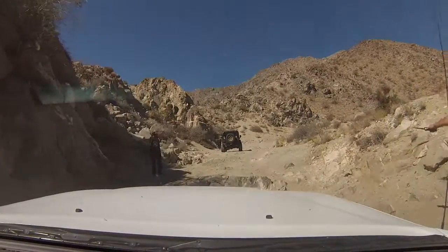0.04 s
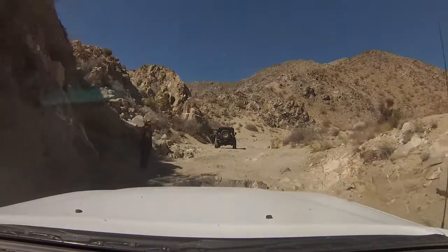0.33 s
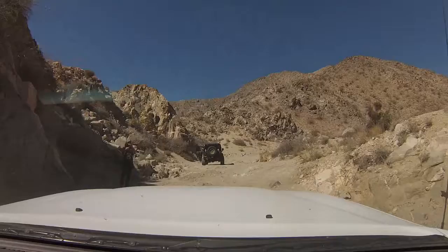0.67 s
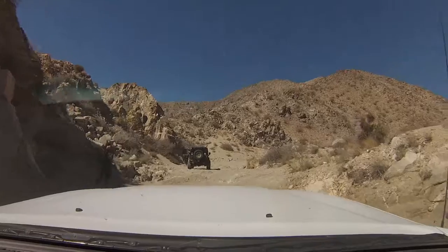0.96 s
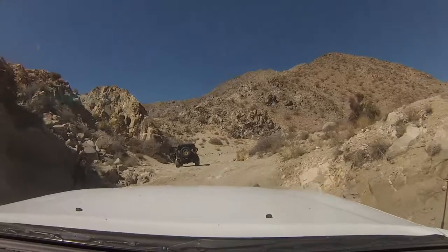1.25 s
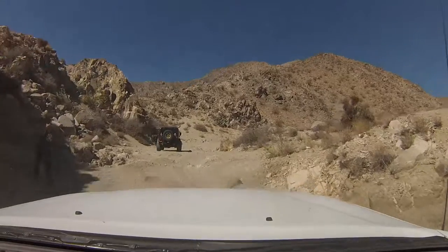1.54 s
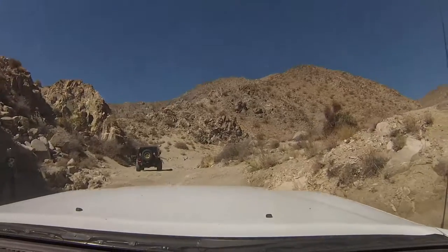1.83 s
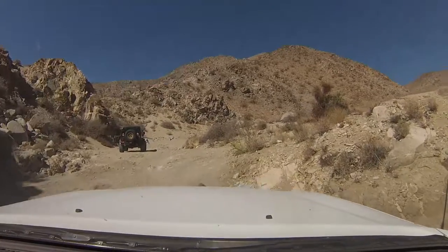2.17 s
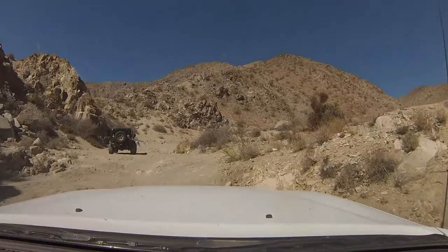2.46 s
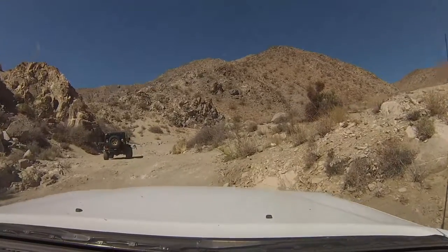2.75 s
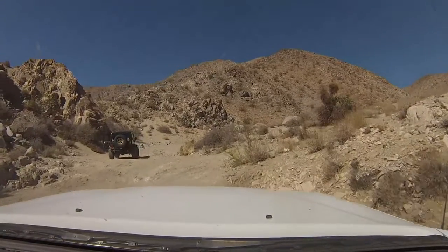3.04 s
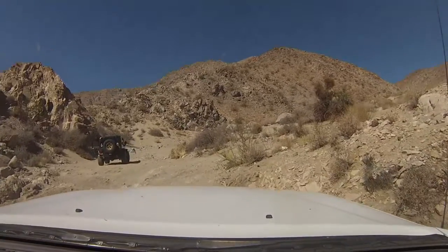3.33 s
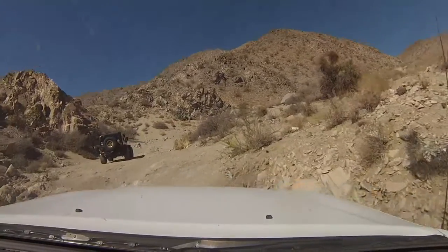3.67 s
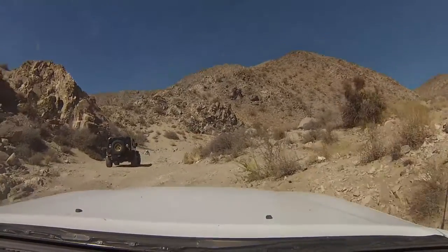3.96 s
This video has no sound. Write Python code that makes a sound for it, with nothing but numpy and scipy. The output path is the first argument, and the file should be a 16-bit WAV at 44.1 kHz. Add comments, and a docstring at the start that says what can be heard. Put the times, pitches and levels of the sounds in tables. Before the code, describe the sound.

A deep, throbbing rumble fills an off-road vehicle's cabin as it creeps over a stony trail, swelling near 0.7, 1.7 and 3.7 seconds. A hard fitting close by knocks sharply at about 0.4, 0.7, 1.6 and 1.9 seconds, each a crack with a short ring. Stones thud through the chassis, heaviest around 3.5 seconds. Trim rattles and squeaks faintly on the bumps, over quiet, muffled tyre grit.

```python
"""A deep cabin boom and chassis rumble inside an off-road vehicle creeping along a sandy, stony trail.
The cabin air throbs at one low pitch. As the body rocks, a hard fitting close by knocks sharply
four times, each a crack and a short ring. Stones thud through the chassis and tyres grind over grit.
A loose panel taps; trim rattles, scrapes and squeaks on the bumps, over a faint hiss."""
import sys
import numpy as np
from scipy.fft import rfft, irfft, next_fast_len
from scipy.io import wavfile
from scipy.ndimage import map_coordinates

SR = 44100
rng = np.random.default_rng(int(sys.argv[2]) if len(sys.argv) > 2 else 0)


def file_out(sig):
    """Save sig as 16-bit WAV at sys.argv[1]."""
    # one column per channel
    cols = np.atleast_2d(sig).T
    # limit, then scale
    lim = np.clip(cols, -1, 1)
    pcm = np.round(lim * 32767).astype(np.int16)
    wavfile.write(sys.argv[1], SR, pcm)


N = 176400
T = np.arange(N) / SR

# cabin boom: time_s, level_db
BOOM_LEVEL = [(0.0, -26.5), (0.14, -33.5), (0.4, -26), (0.5, -31), (0.57, -31), (0.64, -18.5),
              (0.73, -20.5), (0.83, -26), (0.96, -43), (1.0, -33.5), (1.18, -38.5), (1.43, -26),
              (1.6, -27.5), (1.66, -20), (2.04, -29), (2.26, -42), (2.6, -35), (2.72, -42.5), (2.78, -33.5),
              (2.91, -36.5), (2.96, -31.5), (3.03, -35.5), (3.12, -43), (3.25, -25), (3.36, -38.5),
              (3.41, -27), (3.48, -38.5), (3.52, -28), (3.64, -34.5), (3.7, -22), (3.83, -49),
              (3.91, -28.5), (4.0, -33)]
# boom fundamental: time_s, pitch_hz
BOOM_PITCH = [(0.0, 27.75), (0.17, 30.42), (0.8, 30.15), (0.89, 31.83), (2.16, 31.74), (2.4, 28.67),
              (3.16, 30.36), (3.65, 28.29), (3.75, 24.62)]
# boom overtones: harmonic, gain_db
BOOM_OVERTONES = [(2, -30), (3, -38)]

# knocks of the fitting: start_s, level_db, crack_db, rebound_db, tail_db, tail_top_mode_db
KNOCKS = [(0.4389, -16, 2, -12, 2, -13), (0.722, -14.5, -8, -12, -6.5, 4), (1.607, -13.5, 0, -14, 0, 0),
          (1.852, -13.5, -1, -11.5, -1, 3.5)]
# modes of the fitting: freq_hz, gain_db, t60_s
FITTING_MODES = [(290, -24, .022), (540, -13, .03), (820, -31, .02), (1390, -7.5, .012), (1510, -10.5, .02),
                 (2180, 2, .0175), (2620, -24, .012), (3200, -15, .012), (4060, -22, .028),
                 (4500, -24, .02), (5400, -23, .009), (7300, -20, .009)]
# metal bracket ringing on: freq_hz, gain_db, t60_s
BRACKET_MODES = [(2435, -34, .14), (3984, -51.5, 0.27), (4610, -57.5, .3)]
# contact crack: freq_hz, gain_db
CRACK_SPECTRUM = [(300, -23.5), (1500, -17.5), (3300, -1), (5000, 1.5), (7500, -3.5), (8700, -20.5),
                  (10200, -9), (13000, -23), (16000, -31)]
# panel behind the fitting: freq_hz, gain_db
THUMP_SPECTRUM = [(70, -18), (130, -2.5), (195, -3), (300, -14), (550, -22.5), (900, -32), (1500, -31),
                  (2400, -27), (3500, -42), (8000, -85)]

# suspension thuds: time_s, level_db
THUD_LEVEL = [(0.04, -41.5), (0.33, -51), (0.55, -39.5), (0.73, -35), (0.86, -40), (1.04, -49),
              (1.32, -40.5), (1.56, -51.5), (1.65, -38), (2.1, -44.5), (2.55, -52), (2.72, -49.5),
              (2.89, -40.5), (3.03, -43.5), (3.12, -56), (3.2, -48), (3.38, -50.5), (3.47, -36.5),
              (3.51, -27), (3.55, -41), (3.7, -45), (3.76, -44.5), (3.86, -44.5), (3.97, -39)]
# suspension thuds: freq_hz, gain_db
THUD_SPECTRUM = [(8, -22), (20, -7), (32, 1), (48, 7.5), (64, 2.5), (82, -8), (130, -31), (250, -84),
                 (600, -120)]
# roar of the drive: time_s, level_db
ROAR_LEVEL = [(0.0, -52), (0.17, -56.5), (0.53, -52), (0.8, -49.5), (0.93, -54), (1.02, -55.5),
              (1.38, -54.5), (1.53, -55.5), (1.65, -54), (1.76, -47.5), (1.85, -50), (1.99, -53.5),
              (2.22, -57.5), (2.54, -57), (2.7, -56.5), (2.9, -55.5), (3.06, -54.5), (3.13, -60.5),
              (3.23, -52.5), (3.32, -57), (3.38, -52.5), (3.53, -51), (3.62, -53.5), (3.72, -49),
              (3.82, -56.5), (4.0, -53)]
# roar of the drive: freq_hz, gain_db
ROAR_SPECTRUM = [(50, -24), (88, 2), (105, 1), (135, -4), (195, -1.5), (250, -11.5), (320, -18), (420, -23),
                 (560, -25), (850, -34), (1500, -74.5), (4000, -120)]
# wheels meeting stones: start_s, level_db, body_pitch_hz
BUMPS = [(0.222, -36.5, 110), (0.317, -42, 110), (0.45, -38.5, 140), (0.611, -35, 190.5),
         (0.651, -31, 103.2), (1.246, -44, 160), (1.661, -40.5, 185.8), (1.832, -40.5, 238),
         (2.015, -48.5, 218), (2.144, -44.5, 215.4), (2.33, -47, 200), (2.435, -42, 96),
         (2.745, -44, 133.5), (2.836, -39, 116), (2.965, -47, 130), (3.405, -43.5, 195.5),
         (3.496, -36.5, 207), (3.689, -40, 186.3)]
# body shudder on a stone: freq_hz, gain_db
SHUDDER_SPECTRUM = [(50, -12.5), (105, 2), (150, -2.5), (200, -6), (300, -20), (560, -28), (1000, -57.5),
                    (2500, -120)]

# loose panel taps: start_s, level_db, body_db, bounce_db
TAPS = [(0.6145, -51.5, 2.5, -16), (0.6331, -50.5, 3.5, -14), (0.973, -52, -10, -9.5),
        (2.0703, -57.5, -14.5, -6), (2.392, -59, -8, 2), (3.2428, -55.5, -4.5, -6), (3.6611, -47.5, 1, -14)]
# panel ring: freq_hz, gain_db, t60_s
PANEL_MODES = [(1300, -6.5, .04), (1480, -6, 0.032), (2100, -5.5, 0.052), (2480, -9.5, 0.054)]
# hollow panel body: freq_hz, gain_db, t60_s
PANEL_BODY_MODES = [(304, -1.5, 0.035), (528, -0.5, 0.071), (840, -7.5, 0.031)]
# shaken trim: start_s, level_db, t60_s
RATTLES = [(0.637, -54.5, 0.11), (0.884, -59.5, 0.077), (1.656, -49.5, 0.16), (1.696, -56, 0.13),
           (1.776, -60, .1), (1.815, -58, .1), (2.33, -63.5, 0.15), (2.408, -64, 0.1), (3.46, -56, 0.2),
           (3.495, -61.5, 0.28), (3.72, -57.5, 0.2)]
# trim and panel contacts: freq_hz, gain_db
TRIM_SPECTRUM = [(200, 0), (560, 6.5), (900, -5.5), (1480, 7.5), (1900, -5.5), (2350, 5.5), (2800, -11.5),
                 (3400, -8), (4800, -19.5), (6200, -22), (8000, -31.5), (16000, -53.5)]

# tyres on grit: time_s, level_db
GRIT_LEVEL = [(0.0, -75), (0.3, -76.5), (0.59, -69), (0.77, -68.5), (1.37, -78), (1.55, -77), (1.65, -68.5),
              (1.77, -67.5), (1.94, -70), (2.04, -76.5), (2.6, -79), (2.83, -77), (3.4, -74), (3.55, -71),
              (3.72, -68.5), (3.84, -74.5)]
# tyres on grit: freq_hz, gain_db
GRIT_SPECTRUM = [(300, -12.5), (600, -8.5), (950, -5), (1200, -2), (1480, 4), (1900, -6.5), (2350, 0.5),
                 (2750, -15.5), (3400, -12.5), (4500, -28), (6200, -23), (9000, -39.5), (16000, -68)]
# crushed gravel patches: start_s, length_s, level_db
CRUNCHES = [(0.15, 0.054, -71), (1.06, 0.065, -74), (1.135, 0.086, -69), (1.22, 0.08, -69.5),
            (2.65, 0.17, -75), (2.9, .13, -72), (3.3, 0.069, -67.5), (3.71, .04, -61), (3.94, 0.067, -71)]
# crushed gravel: freq_hz, gain_db
CRUNCH_SPECTRUM = [(500, -16.5), (1000, -10), (1250, 0.5), (1520, 3.5), (1900, -9), (2350, -6.5),
                   (2800, -19), (4500, -28.5), (9000, -46)]

# sliding trim: start_s, length_s, level_db
SCRAPES = [(0.335, .07, -75), (0.62, 0.11, -74.5), (1.645, 0.18, -71.5), (2.315, .055, -77),
           (3.23, .04, -78), (3.62, 0.095, -79)]
# sliding trim: freq_hz, gain_db
SCRAPE_SPECTRUM = [(2000, -22.5), (3200, 6), (4500, -3), (6200, 3), (7200, -7.5), (8600, -7), (11500, -13),
                   (15000, -27)]
# rubbing trim: start_s, length_s, pitch_hz, level_db, scratch_0_to_1
SQUEAKS = [(0.454, 0.0066, 6200, -63, 0.9), (0.646, 0.034, 6100, -74.5, 0.6), (1.04, 0.12, 6130, -80, 0.94),
           (1.692, 0.037, 5990, -65.5, 0), (1.699, 0.09, 6150, -80, 0.3), (1.682, 0.082, 10020, -79, 0.02),
           (3.528, 0.021, 6300, -77, 0.74), (3.549, 0.079, 1770, -67, 0.14)]
# background hiss: freq_hz, gain_db
HISS_SPECTRUM = [(500, 1.5), (4000, 1.5), (10000, -3.5), (12500, -12.5), (16000, -18.5)]


def cabin_boom():
    """Cabin air throbs at one very low pitch, swelling as the body rocks."""
    phase = 2 * np.pi * np.cumsum(curve(BOOM_PITCH)) / SR
    overtones = sum(amp(db) * np.sin(k * phase + wobble(rate_hz=5.3)) for k, db in BOOM_OVERTONES)
    level_db = curve(BOOM_LEVEL) + 1 + 0.17 * wobble(rate_hz=4.4)
    return unit(np.sin(phase) + overtones) * amp(level_db)


def fitting_knocks():
    """A hard fitting cracks, rings and rebounds; its panel thumps and its bracket rings on."""
    attack_s, rebound_s = 0.00034, 0.00275
    out, t = np.zeros(N), np.arange(SR // 3) / SR
    for start_s, level_db, crack_db, rebound_db, tail_db, top_db in KNOCKS:
        ring = ringing(FITTING_MODES, t, attack_s)
        tail = ringing(BRACKET_MODES[:-1], t, attack_s)
        tail += amp(top_db) * ringing(BRACKET_MODES[-1:], t, attack_s)
        crack = amp(crack_db - 12.5) * noise(CRACK_SPECTRUM)[:len(t)] * strike(t, attack_s, t60_s=0.0099)
        thump = amp(-18) * noise(THUMP_SPECTRUM)[:len(t)] * strike(t, attack_s=0.0021, t60_s=0.11)
        add(out, start_s, amp(level_db) * (ring + crack + thump + amp(tail_db) * tail))
        add(out, start_s + rebound_s, amp(level_db + rebound_db) * (ring + crack))
    return out


def chassis_rumble():
    """Suspension thuds, the dull roar of the drive and the body's hollow answer to each stone."""
    thuds = amp(curve(THUD_LEVEL) + 2.5) * noise(THUD_SPECTRUM)
    roar = amp(curve(ROAR_LEVEL) + 2.5) * grainy(ROAR_SPECTRUM, grain_db=2)
    shudder = amp(-3.5) * noise(SHUDDER_SPECTRUM)
    bumps = np.zeros(N)
    for start_s, level_db, pitch_hz in BUMPS:
        t = T - start_s
        body = np.sqrt(2) * np.sin(2 * np.pi * pitch_hz * t)
        bumps += amp(level_db) * strike(t, attack_s=0.0088, t60_s=0.14) * (body + shudder)
    return thuds + roar + bumps


def panel_taps():
    """A loose panel clicks, rings and bounces once; squarer blows sound its hollow body more."""
    attack_s, mean_bounce_s = 0.00069, 0.0067
    out, t = np.zeros(N), np.arange(SR // 4) / SR
    for start_s, level_db, body_db, bounce_db in TAPS:
        click = amp(-1.5) * noise(TRIM_SPECTRUM)[:len(t)] * strike(t, attack_s, t60_s=0.029)
        contact = click + ringing(PANEL_MODES, t, attack_s)
        body = amp(body_db) * ringing(PANEL_BODY_MODES, t, attack_s)
        bounce_s = mean_bounce_s * (1 + rng.normal() / 10)
        add(out, start_s, amp(level_db) * (contact + body))
        add(out, start_s + bounce_s, amp(level_db + bounce_db) * contact)
    return out


def trim_rattles():
    """Bumps set off brief flurries of tiny contacts in the trim."""
    attack_s = 0.00404
    flurries = sum(amp(db) * strike(T - start_s, attack_s, t60_s) for start_s, db, t60_s in RATTLES)
    return flurries * grainy(TRIM_SPECTRUM, grain_db=1.5)


def tyre_grind():
    """Grit grinds under the tyres, muffled by the cabin; gravel patches swell into a rasp."""
    grit_db = curve(GRIT_LEVEL) + 0.5 + 1.57 * wobble(rate_hz=22)
    grit = amp(grit_db) * grainy(GRIT_SPECTRUM, grain_db=2)
    gravel = swells(CRUNCHES) * grainy(CRUNCH_SPECTRUM, grain_db=1.5)
    return grit + gravel


def trim_scrapes():
    """Trim slides over trim in a bright, scratchy chatter."""
    return swells(SCRAPES) * grainy(SCRAPE_SPECTRUM, grain_db=4)


def trim_squeaks():
    """Rubbing trim chirps thinly; uneven slip makes some chirps scratchy."""
    out = np.zeros(N)
    for start_s, length_s, pitch_hz, level_db, scratch in SQUEAKS:
        n = int(length_s * SR)
        envelope = np.hanning(n) * np.abs(1 + scratch * wobble(rate_hz=500)[:n] / 2)
        jitter = (0.004 + scratch * 0.068) * wobble(rate_hz=2000)[:n]
        phase = 2 * np.pi * np.cumsum(pitch_hz * (1 + jitter)) / SR
        add(out, start_s, amp(level_db) * np.sqrt(2) * envelope * np.sin(phase))
    return out


def hiss():
    """Faint, steady background hiss."""
    return amp(-84) * noise(HISS_SPECTRUM)


def amp(db):
    """Decibels to gain."""
    return 10 ** (np.asarray(db) / 20)


def unit(x):
    """Scale to rms 1."""
    return x / np.sqrt(np.mean(x ** 2) + 1e-20)


def curve(rows):
    """Join (time_s, value) rows by straight lines."""
    return np.interp(T, *np.transpose(rows))


def wobble(rate_hz):
    """Smooth random curve, rate_hz knots a second."""
    return map_coordinates(rng.standard_normal(int(4.2 * rate_hz) + 4), [T * rate_hz])


def filtered(x, gain):
    """Apply gain(freq_hz) to the spectrum of x."""
    size = next_fast_len(N + SR // 2)
    return irfft(rfft(x, size) * gain(np.fft.rfftfreq(size, 1 / SR)), size)[:N]


def coloured(x, spectrum):
    """Shape x by (freq_hz, gain_db) rows; rms 1."""
    freq_hz, gain_db = np.transpose(spectrum)
    return unit(filtered(x, lambda hz: amp(np.interp(np.log(hz + 1), np.log(freq_hz), gain_db))))


def noise(spectrum):
    """Coloured noise; rms 1."""
    return coloured(rng.standard_normal(N), spectrum)


def grainy(spectrum, grain_db):
    """Coloured noise in clumps a few milliseconds long; rms 1."""
    return coloured(rng.standard_normal(N) * amp(grain_db * wobble(rate_hz=400)), spectrum)


def strike(t, attack_s, t60_s):
    """Envelope that rises from t = 0 and dies away."""
    t = np.maximum(t, 0)
    return (1 - np.exp(-t / attack_s)) * np.exp(-np.log(1000) * t / t60_s)


def ringing(modes, t, attack_s, scatter_db=0.5):
    """Struck modes whose levels vary from blow to blow."""
    return sum(amp(db + rng.normal(0, scatter_db)) * strike(t, attack_s, t60_s)
               * np.sin(2 * np.pi * hz * t) for hz, db, t60_s in modes)


def swells(rows):
    """Envelope of half-sine swells."""
    return sum(amp(db) * np.sin(np.pi * np.clip((T - start_s) / length_s, 0, 1))
               for start_s, length_s, db in rows)


def add(track, start_s, sound):
    """Mix sound into track at start_s."""
    part = track[int(start_s * SR):][:len(sound)]
    part += sound[:len(part)]


def scene():
    """Mono sum of everything heard in the cabin."""
    mix = cabin_boom() + fitting_knocks() + chassis_rumble() + panel_taps() + trim_rattles()
    mix += tyre_grind() + trim_scrapes() + trim_squeaks() + hiss()
    return mix[None]


def record(dry):
    """Brick-wall low-pass."""
    cutoff_hz = 15800
    return filtered(dry[0], lambda hz: hz < cutoff_hz)[None]


dry = scene()
out = record(dry)
file_out(out)
```